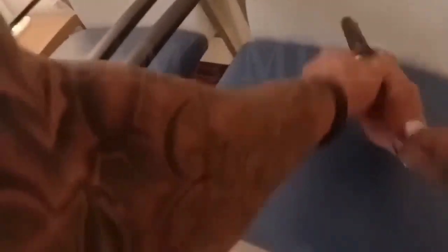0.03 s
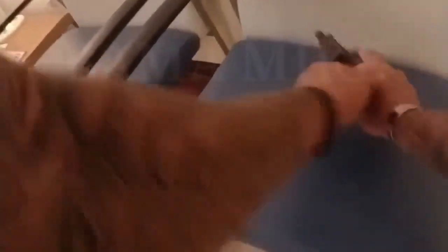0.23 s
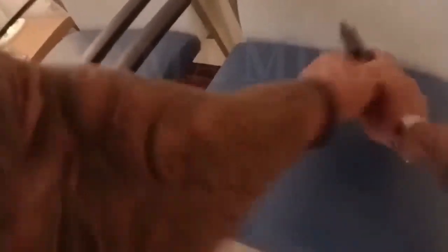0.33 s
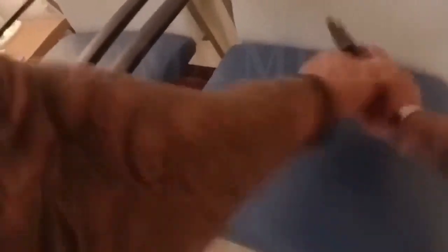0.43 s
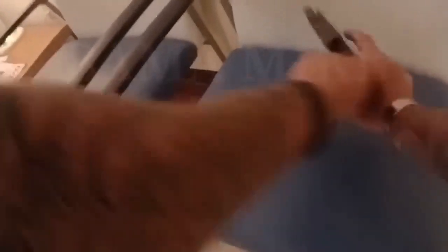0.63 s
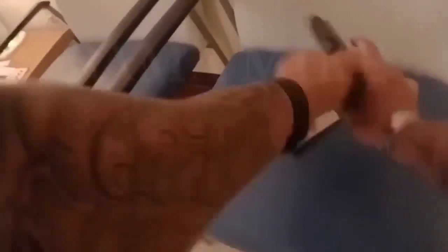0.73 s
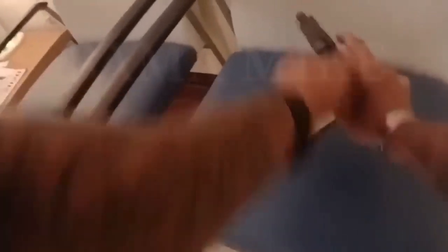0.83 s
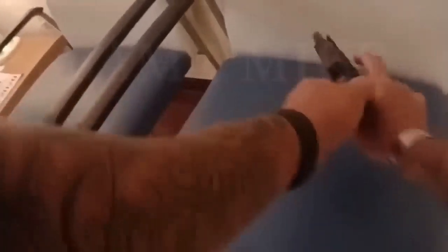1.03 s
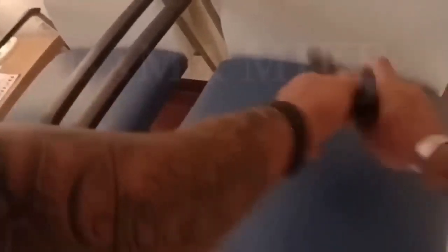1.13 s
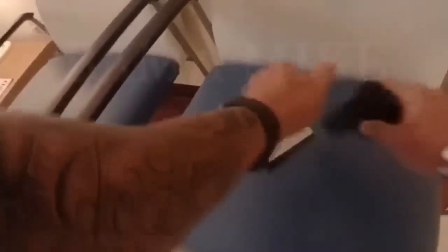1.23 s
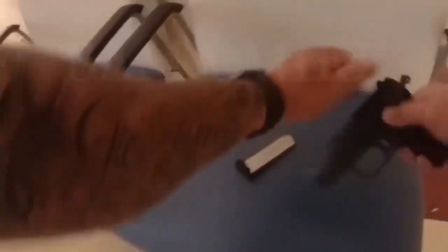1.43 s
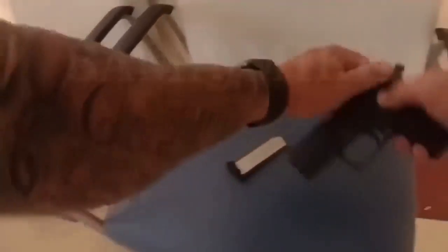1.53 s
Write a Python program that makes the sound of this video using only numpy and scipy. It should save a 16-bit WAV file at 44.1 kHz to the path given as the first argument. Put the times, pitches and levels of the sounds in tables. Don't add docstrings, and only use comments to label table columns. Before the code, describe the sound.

A pistol is unloaded by hand, close to a phone microphone in a small furnished room. A small click at 0.2 s, a loud ringing double clack at 0.33, a magazine catch snap at 0.53, a heavy clack at 0.75. The slide scrapes back at 0.93, slams home at 1.01 and locks hard at 1.25. Faint pats follow; soft thuds, handling rumble and dull hush lie underneath.

```python
import sys
import numpy as np
from scipy import signal
from scipy.fft import rfft, irfft
from scipy.io import wavfile
from scipy.ndimage import uniform_filter1d

SR = 44100
rng = np.random.default_rng(int(sys.argv[2]) if len(sys.argv) > 2 else 0)


def waveform_to_disk(signal):
    frames = np.transpose(np.atleast_2d(signal))
    scaled = np.clip(frames, -1, 1) * 32767
    samples = np.round(scaled).astype(np.int16)
    wavfile.write(sys.argv[1], SR, samples)


def level_to_linear(level):
    exponent = np.asarray(level, float) / 20
    return 10 ** exponent


N = 70560
RISE_S = 0.0012

# pitch_hz, level_db (per Hz)
RUMBLE = [(12, -43), (20, -38), (81, -1.5), (156, 0.5), (206, -1), (292, -17.5), (400, -20), (520, -37),
          (880, -120)]
# pitch_hz, level_db, time to fall 60 dB (t60_s)
FRAME = [(2556, 0.1, .065), (2505, -15, .06), (2630, -15, .04), (4720, -15, .015), (6480, -24, .03)]
# pitch_hz, level_db, t60_s
CLOSED = [(2515, 0.1, .04), (2580, -4, .05), (2450, -10, .03), (3150, -9, .018), (4680, -5, .014),
          (4830, -9, .02), (6480, -14, .015)]


def evened(x):
    return x / np.sqrt(np.mean(x ** 2) + 1e-20)


def read(points, hz):
    f, value = np.transpose(points)
    return np.interp(np.log(hz + 1), np.log(f + 1), value)


def colour(x, tone):
    hz = np.fft.rfftfreq(4096, 1 / SR)
    db = read(tone, hz) + 40 * np.log10(np.clip(hz / tone[0][0], .01, 1))
    cepstrum = irfft(np.log(level_to_linear(np.maximum(db, -100))))
    cepstrum[1:2048] *= 2
    cepstrum[2049:] = 0
    taps = irfft(np.exp(rfft(cepstrum)))
    return signal.oaconvolve(x, taps / np.linalg.norm(taps))[:len(x)]


def hush():
    # pitch_hz, level_db (per Hz)
    hush_tone = [(300, -2), (500, -2.5), (1200, -4), (2700, -10.5), (3600, -21.5), (8000, -34.5),
                 (15000, -41)]
    # time_s, level_db
    hush_curve = [(0, -1.5), (.17, -8), (.4, 7), (1.3, 3), (1.6, -1.3)]
    t = np.arange(N) / SR
    loudness = level_to_linear(-48 + np.interp(t, *np.transpose(hush_curve)))
    return loudness * evened(colour(rng.standard_normal(N), hush_tone))


def rumble():
    # time_s, level_db
    effort = [(0, -38.5), (.15, -43), (.2, -58), (.3, -38.5), (.75, -34.5), (.95, -39.5), (1.07, -43.5),
              (1.2, -37.5), (1.6, -44)]
    t = np.arange(N) / SR
    loudness = level_to_linear(np.interp(t, *np.transpose(effort)))
    return loudness * evened(colour(rng.standard_normal(N), RUMBLE))


def thuds():
    # start_s, peak_db, pitch_hz, time to fall 60 dB (t60_s)
    bumps = [(.014, -29.5, 145, 0.11), (.049, -27, 174, 0.11), (.211, -22, 161.7, 0.077),
             (.353, -18.5, 104, 0.073), (0.425, -18, 106, 0.1), (.564, -19.5, 170.5, 0.1),
             (.642, -15, 149.3, 0.066), (.732, -13.5, 121, 0.056), (.757, -21.5, 149, 0.087),
             (.863, -27, 118, 0.095), (.985, -18, 116, 0.079), (1.357, -24.5, 187, 0.1),
             (1.417, -27.5, 144.5, 0.14)]
    rise_s, gain_db, puff_share = 0.0045, 3, 0.33
    t, out = np.arange(N) / SR, np.zeros(N)
    puff = evened(colour(rng.standard_normal(N), RUMBLE))
    for s, db, hz, t60 in bumps:
        since = np.maximum(t - s, 0)
        swell = 1 - np.exp(-(since / rise_s) ** 2)
        fade = level_to_linear(db + gain_db - 60 * np.minimum(since, 1) / t60)
        out += swell * fade * (np.sin(2 * np.pi * hz * since) + puff_share * puff)
    return out


def room(x):
    # pitch_hz, time to fall 60 dB (t60_s)
    decay = [(300, 0.65), (1000, 0.41), (2500, 0.49), (5000, 0.4), (9000, 0.34), (14000, 0.32)]
    gap_s = 0.0035
    out, phase = np.zeros(N), np.arange(N) / SR * 7
    for k in range(3):
        hz, t, z = signal.stft(rng.standard_normal(SR // 2), SR, nperseg=256)
        fading = z * level_to_linear(-60 * t / read(decay, hz)[:, None])
        tail = signal.istft(fading, SR, nperseg=256)[1]
        tail *= np.clip(np.arange(len(tail)) / SR / gap_s, 0, 1) ** 2
        share = np.cos(phase + k * np.pi / 3) * np.sqrt(2 / 3)
        out += signal.fftconvolve(x * share, tail / np.linalg.norm(tail))[:N]
    return out


def grit():
    size = level_to_linear(3.5 * np.minimum(rng.exponential(1, N), 4)) * rng.standard_normal(N)
    hits = rng.random(N) < 6000 / SR
    return evened(size * (0.22 + hits))


def scrapes():
    # start_s, end_s, start_db, end_db
    slides = [(0.186, 0.201, -42, -34.5), (0.303, 0.328, -37, -34), (0.686, 0.716, -38.5, -38),
              (0.724, 0.746, -41, -24.5), (0.899, 0.926, -32.5, -18.5), (0.946, 1.004, -37.5, -31),
              (0.988, 1.002, -24.5, -33.5), (1.228, 1.252, -38.5, -19), (0.348, 0.442, -33, -47.5),
              (0.754, 0.888, -41.5, -46), (1.015, 1.143, -42, -44.5), (1.263, 1.404, -36, -51)]
    # pitch_hz, level_db (per Hz)
    scrape_tone = [(180, -37.5), (300, -7), (714, -9), (2560, 1), (3070, -6), (4000, -11), (4750, -6.5),
                   (5900, -14), (12300, -24.5), (13400, -25.5), (15000, -36)]
    t, push = np.arange(N) / SR, np.zeros(N)
    for a, b, from_db, to_db in slides:
        during = (t > a) * (t < b)
        push += level_to_linear(from_db + (to_db - from_db) * (t - a) / (b - a) * (t < b)) * during
    lumps = uniform_filter1d(rng.standard_normal(N), size=120)
    lumps = evened(uniform_filter1d(lumps, size=120))
    rough = evened(0.8 * grit() + rng.standard_normal(N))
    return colour(uniform_filter1d(push, size=130) * level_to_linear(3 * lumps - 1.0) * rough, scrape_tone)


def ring(x, modes):
    t = np.arange(SR // 2) / SR
    body = np.zeros(len(t))
    for hz, db, t60 in modes:
        body += level_to_linear(db - 60 * t / min(t60, .22)) * np.sin(2 * np.pi * hz * t)
    return signal.oaconvolve(x, body * np.minimum(t / RISE_S / 2, 1))[:len(x)]


def knocks(rows, tone, modes, ring_room_db):
    t = np.arange(N) / SR
    noise = colour(0.57 * grit() + rng.standard_normal(N), tone)
    direct, blow, wet = np.zeros((3, N))
    for s, db, length, ring_db, room_db in rows:
        since = np.maximum(t - s, 0)
        shape = np.minimum(since / RISE_S, 1) * np.exp(-(since / max(length, .001)) ** 2.03)
        rattle = shape * noise
        burst = level_to_linear(db - 6.5) * rattle * np.linalg.norm(shape) / np.linalg.norm(rattle)
        direct += burst
        wet += level_to_linear(room_db) * burst
        blow[round(s * SR)] += level_to_linear(db + ring_db)
    rung = ring(blow, modes)
    return np.array([direct + rung, wet + level_to_linear(ring_room_db) * rung])



def ticks():
    tick_rows = [(.352, -19, .002, -7, -9), (0.36, -24, .002, -25, -10), (0.54, -36, .002, -25, -10),
                 (.683, -26, .003, -25, -8), (.693, -27, .004, -25, -9), (.7055, -24, .003, -20, -8),
                 (.708, -19, .002, -11, -9), (.9005, -25, .003, -25, -9), (.907, -23.5, .003, -20, -9),
                 (.9885, -25, .004, -25, -9), (1.4, -31, .003, -23.5, -7.5),
                 (1.2405, -18.5, .005, -22.5, -5), (1.478, -36, .004, -23, -5.5)]
    tick_tone = [(500, -13), (1500, 0), (2200, 2.5), (3200, -6.5), (4800, -12), (6000, -18), (13300, -25.5),
                 (15000, -43.5)]
    return knocks(tick_rows, tick_tone, FRAME, -5)


def palm():
    palm_rows = [
        (.362, -16.5, 0.005, -31, -13),
        (1.459, -28.5, 0.006, -43, -10),
        (.457, -31.5, 0.0077, -32, 3.5),
    ]
    palm_tone = [(300, -9.5), (800, -3.7), (1150, -8), (1700, -14), (14000, -57.5)]
    return knocks(palm_rows, palm_tone, FRAME, -5)


def grip():
    grip_rows = [(.309, -20.5, .007, -25, -5), (.5063, -26, .003, -23.5, -13), (.631, -13, .003, -19, -7),
                 (.641, -23.5, .006, -14, -6), (.9116, -11.5, .004, -22, -11),
                 (.970, -19, .0022, -6.5, -13), (.9777, -13.5, .0035, -24.5, -12),
                 (.9916, -9.5, .005, -24, -12.5), (1.5552, -33, 0.0023, -24, -12)]
    grip_tone = [(500, -26), (1000, -9), (1400, 7), (2000, -1.5), (2600, -8), (4700, -13.5), (6000, -30.5),
                 (13000, -39), (15000, -54)]
    return knocks(grip_rows, grip_tone, CLOSED, -3)


def catch():
    catch_rows = [
        (.1985, -16.5, 0.005, -21, -9),
        (.185, -30.5, 0.002, -30, -10),
        (0.22, -25, 0.0021, -30, -11),
    ]
    catch_tone = [(250, -18), (800, -5), (1820, -2.5), (2800, -8), (4600, -6), (5500, -20.5), (7300, -13.5),
                  (13100, -34), (15000, -52)]
    return knocks(catch_rows, catch_tone, FRAME, -5)


def seat():
    seat_rows = [
        (.3095, -23, 0.0035, -19, -4),
        (.3205, -23.5, 0.0027, -14, -1),
        (.331, -2.5, 0.0038, -11, -12),
        (.3335, -3.5, 0.0031, -2.5, -13.5),
    ]
    seat_tone = [(150, -21), (250, -10), (1820, -1), (4300, -5.5), (5010, 1.5), (6260, -15.5), (11800, -18),
                 (13100, -14.5), (15000, -65)]
    return knocks(seat_rows, seat_tone, FRAME, -7)


def release():
    release_rows = [
        (.5327, -5.5, 0.0046, -4.5, -12.5),
        (.537, -13, 0.0028, -12.5, -5),
    ]
    release_tone = [(150, -46), (500, -23), (1400, -1), (2500, -3), (3300, -17), (4760, -3.5),
                    (5750, -24.5), (13300, -33.5), (15000, -42)]
    # pitch_hz, level_db, t60_s
    freed = [(2562, 0.1, .07), (2510, -12, .05), (2640, -13, .04), (4760, -11, .012), (6480, -15, .018),
             (6650, -20, .015)]
    return knocks(release_rows, release_tone, freed, -8)


def drop():
    drop_rows = [
        (.7365, -22, 0.0086, -16, -12),
        (.7525, -2, 0.0018, -20.5, -15),
        (.7540, -1, 0.0045, -19.5, -10.5),
        (.764, -18.5, 0.0022, -14, -9),
        (.777, -17, 0.0025, -5, -7.5),
    ]
    drop_tone = [(150, -38.5), (250, -20.5), (1150, -12), (2480, -3.5), (4760, 0.5), (5650, -13.5),
                 (11800, -25), (12900, -23), (15000, -50.5)]
    return knocks(drop_rows, drop_tone, CLOSED, 1.5)


def slide_back():
    back_rows = [(.9115, -11, 0.0031, -26, -13.5), (.916, -16.5, 0.0026, -19.5, -9),
                 (.9265, -4.5, 0.0026, -24, -11), (.9235, -4.5, 0.004, -21.5, -12),
                 (.9293, 0, 0.0034, -28.5, -11), (.9345, -18.5, 0.0026, -13.5, -11.5),
                 (.9405, -24.5, .002, -18.5, -12.5), (.946, -26, 0.0022, 0, -11),
                 (.956, -21.5, .003, -12, -8.5)]
    back_tone = [(150, -28), (250, -20), (1510, -4), (1670, 1), (4680, -7.5), (5550, -20.5), (9130, -11),
                 (13800, -23.5), (15000, -37)]
    return knocks(back_rows, back_tone, CLOSED, -3)


def slide_home():
    home_rows = [
        (1.0073, 0, 0.005, -5.5, -13),
        (1.0125, -13, .003, -5, -17.5),
        (1.017, -18.5, .003, -0.5, -14),
    ]
    home_tone = [(150, -61.5), (250, -32.5), (1990, -12.5), (2480, -6.5), (2900, -7.5), (5950, -6),
                 (7060, -17.5), (13100, -19.5), (15000, -56)]
    return knocks(home_rows, home_tone, CLOSED, -5)


def slide_lock():
    lock_rows = [
        (1.248, -19, 0.0035, -15, -12),
        (1.2512, -3, 0.0041, -14, -13),
        (1.2545, -0.5, 0.0029, -13.5, -14),
        (1.257, -7, 0.0037, -13, -7),
        (1.261, -16, 0.0038, -13.5, -10),
        (1.276, -22, .003, -12, -8),
    ]
    lock_tone = [(150, -49), (500, -20.5), (950, -5), (1600, -1.5), (2100, -7), (2800, -1), (3700, -12),
                 (4900, 1), (6600, -12.5), (9300, -7), (13500, -13), (15000, -57)]
    # pitch_hz, level_db, t60_s
    slide_modes = [(950, -7, .012), (1690, -3, .015), (2300, -6, .02), (2600, -1, .014), (2900, -3, .012),
                   (4608, -3, .02), (5200, -4, .01), (6700, -10, .01), (8808, -12, .022), (9615, -12, .022),
                   (9910, -10, .018), (12900, -13, .015)]
    return knocks(lock_rows, lock_tone, slide_modes, 1.5)


def scene():
    handling = ticks() + palm() + grip()
    working = catch() + seat() + release() + drop() + slide_back() + slide_home() + slide_lock()
    direct, wet = handling + working
    rub = scrapes()
    echoes = room(wet + level_to_linear(-11) * rub)
    return (direct + rub + echoes + thuds() + rumble() + hush())[None]


def low_pass(x):
    return signal.sosfilt(signal.butter(12, 15280, fs=SR, output="sos"), x)


def record(dry):
    limit, edge_hz = 1.1, 14300
    limited = limit * np.tanh(dry / limit)
    mix = signal.oaconvolve(limited, signal.firwin(101, edge_hz, fs=SR)[None], "same")
    return low_pass(mix)


dry = scene()
out = record(dry)
waveform_to_disk(out)
```